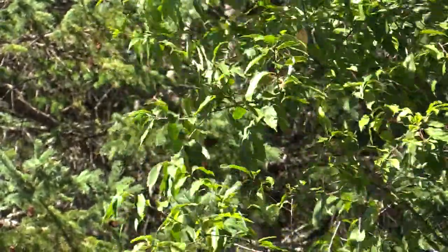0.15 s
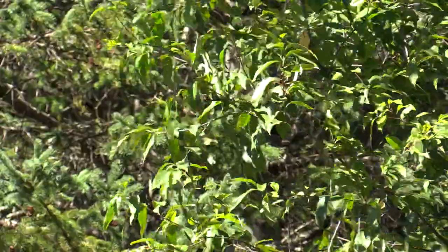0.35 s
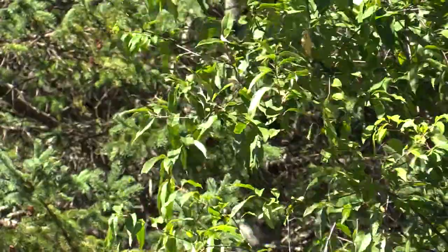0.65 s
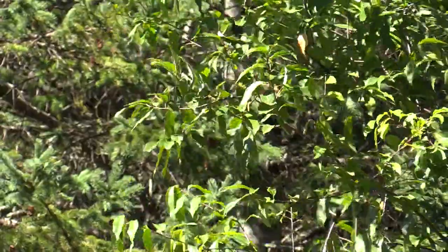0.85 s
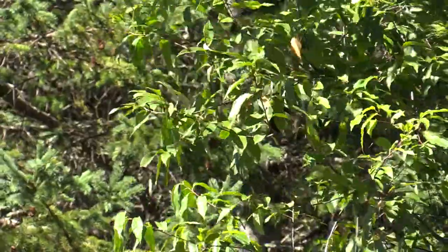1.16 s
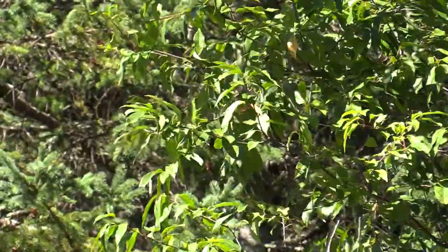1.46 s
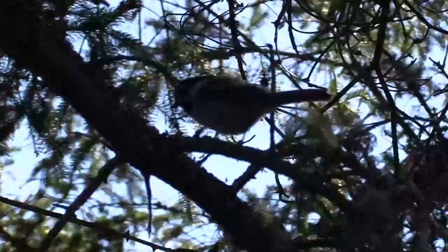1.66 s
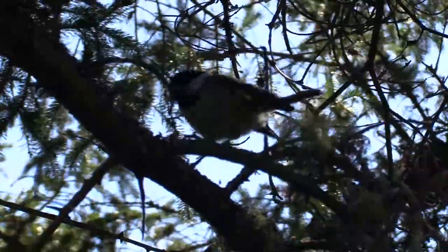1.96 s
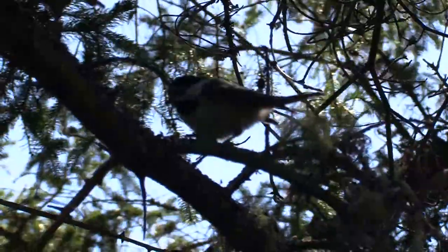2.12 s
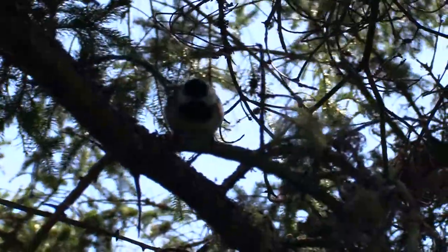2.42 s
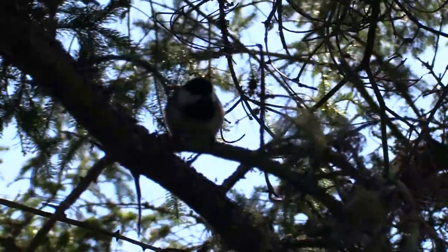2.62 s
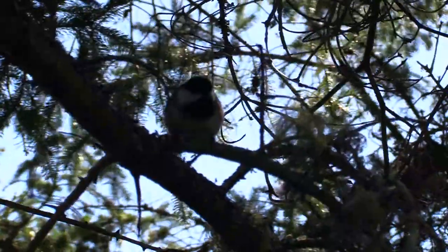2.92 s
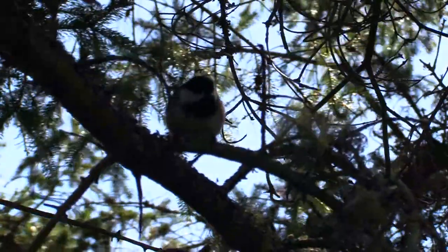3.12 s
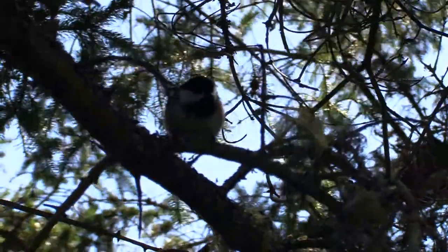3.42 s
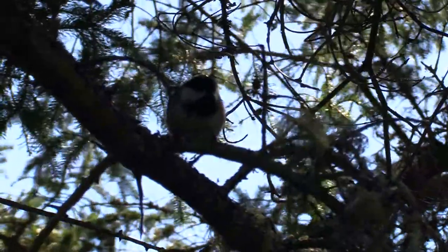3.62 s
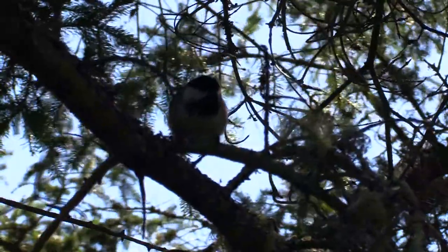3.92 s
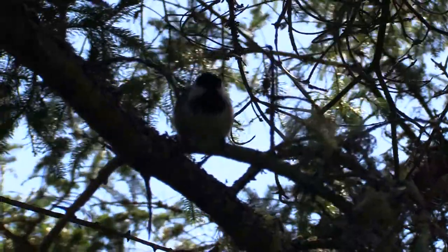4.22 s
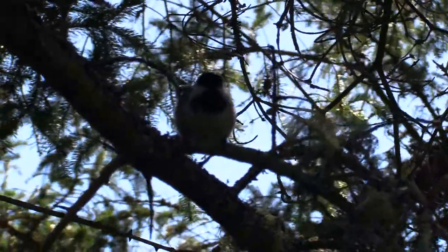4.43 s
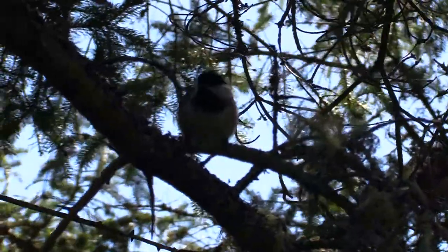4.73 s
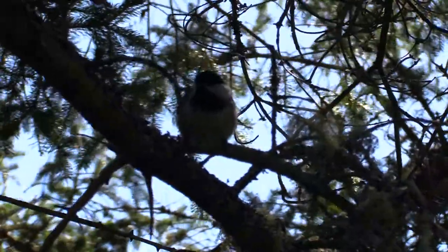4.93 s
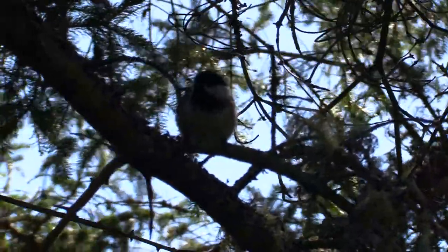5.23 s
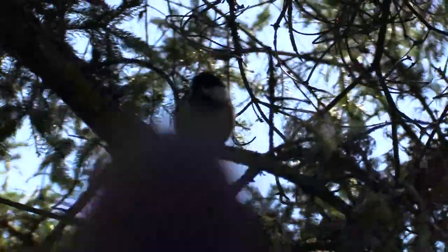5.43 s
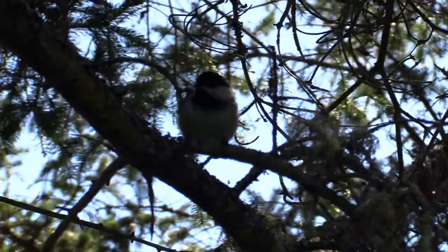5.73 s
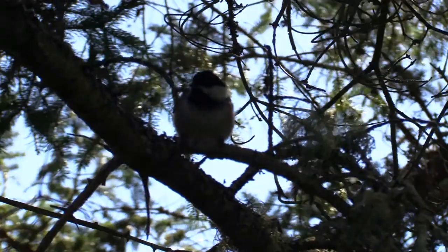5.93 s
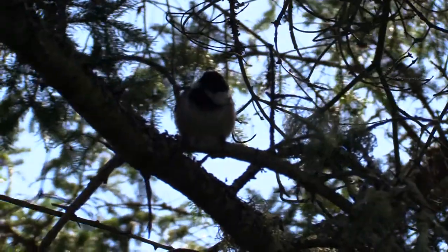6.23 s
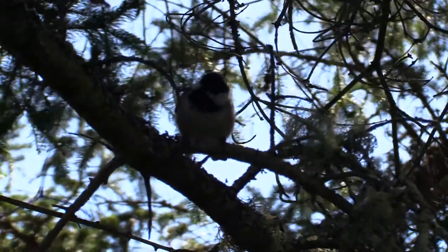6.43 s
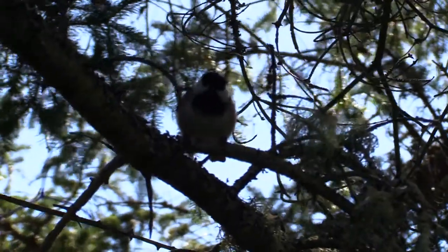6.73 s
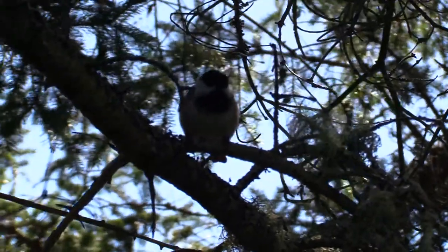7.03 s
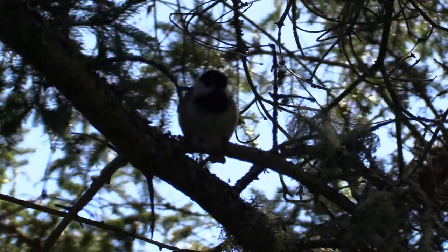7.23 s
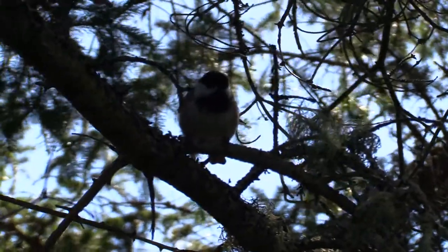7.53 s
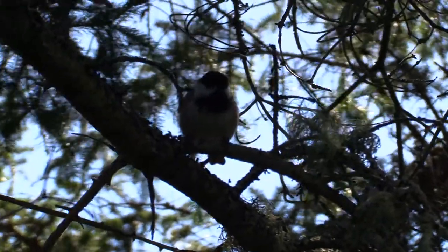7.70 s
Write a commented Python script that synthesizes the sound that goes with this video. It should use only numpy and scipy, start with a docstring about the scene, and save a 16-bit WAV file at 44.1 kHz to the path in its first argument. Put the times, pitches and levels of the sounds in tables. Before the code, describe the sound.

From 0 to 1.66 seconds there is only a quiet, low-weighted breeze through foliage with a faint camera whirr, plus three very fast dull knocks at about 1.07. The air then switches abruptly to a stiller wood. A chickadee immediately gives three high buzzy notes until 1.9; a lower, raspier bird answers with five lengthening notes from 2.3 to 3.0. The higher bird overlaps from 2.8, slows to drawn-out buzzes by 3.9, then rattles off quick, even notes until 5.0. A few very weak lower rasps follow to 5.4, then a pause. From 6.5 the lower bird scolds again, joined by the higher at 6.9, both ending by about 7.4. Soft low handling thumps occur around 3.6, 4.1, 4.6, 5.7, 7.0, 7.35 and strongest at 7.7, with tiny dry ticks near 1.9, 3.3, 5.7 and 6.4, and grip rumble swelling after 7.

```python
"""A quiet wood, where two chickadees scold in runs of short buzzy notes that sometimes overlap.
Each note comes from two coupled membranes, whose sum and difference tones pass a tuned throat.
Air noise of a breezier spot gives way abruptly to that of a stiller one.
The hand-held camera adds damped low thumps, bursts of ticks and knocks, a grip rumble and a faint whirr."""
import sys
import numpy as np
from scipy import signal
from scipy.fft import rfft, irfft
from scipy.io import wavfile
from scipy.ndimage import uniform_filter1d

SR = 44100
rng = np.random.default_rng(int(sys.argv[2]) if len(sys.argv) > 2 else 0)


def put_to_file(sound):
    """Save the sound as 16-bit audio at rate SR, in the file named by the first command-line argument."""
    columns = np.atleast_2d(sound).T  # one column per channel
    safe = np.clip(columns, -1, 1)
    whole_steps = np.round(safe * 32767)
    wavfile.write(sys.argv[1], SR, whole_steps.astype(np.int16))


N = 346626
TIME = np.arange(N) / SR  # seconds

# Air spectrum at the breezy spot. Each row: frequency in Hz, relative spectral level in dB.
BREEZY_SPECTRUM = [(15, -78), (25, -57), (45, -39), (73, -5), (110, 0.5), (368, -9.5), (537, -14.5),
                   (1300, -20), (2700, -20), (2920, -15.5), (3170, -20), (3440, -18.5), (3830, -21.5),
                   (4870, -21.5), (11200, -38.5), (15500, -41)]
# Left-right likeness of the breezy air. Each row: frequency in Hz, correlation from -1 to 1.
BREEZY_LIKENESS = [(60, 0.88), (130, 0.85), (290, 0.87), (640, -0.004), (1410, -0.41), (3100, -0.43),
                   (6820, 0.4), (15000, 0.22)]
# Air spectrum at the still spot. Each row: frequency in Hz, relative spectral level in dB.
STILL_SPECTRUM = [(15, -55), (25, -19), (64, 2.5), (110, -7.5), (129, -4), (152, -1.5), (209, -1.5),
                  (410, -6), (495, -7), (1240, -11), (1380, -12), (2490, -13.5), (3000, -15.5),
                  (4260, -10.5), (15500, -31.5)]
# Left-right likeness of the still air. Each row: frequency in Hz, correlation from -1 to 1.
STILL_LIKENESS = [(60, 0.043), (130, -0.41), (290, 0.39), (640, -0.099), (1410, -0.38), (3100, -0.1),
                  (6820, 0.56), (15000, 0.53)]
BREEZY_DB, STILL_DB = -52, -55.5  # rms level of the mean of both sides
CUT_S = 1.66  # the breezy spot ends here

# Low rumble of the shifting grip. Each row: time in seconds, level in dB.
GRIP_LEVEL = [(1.62, -80), (1.72, -60), (1.96, -50), (2.05, -77), (6.5, -77), (7.05, -43.5), (7.25, -55.5),
              (7.42, -42.5), (7.65, -50), (7.76, -41), (7.86, -43)]
# Jolts of the hand on the camera body. Each row: start in seconds, level in dB, ring frequency in Hz.
JOLTS = [(1.799, -50, 63), (1.95, -49, 64), (3.608, -36, 105), (3.632, -49, 91), (4.08, -42, 109),
         (4.123, -38, 98), (4.206, -42, 82), (4.596, -36, 124), (5.525, -49, 65), (5.735, -32, 105),
         (5.835, -37, 79), (7.025, -38, 94), (7.347, -32, 94), (7.684, -26.5, 102)]
# A quick run of dull knocks. Each row: start in seconds, level in dB.
DULL_KNOCKS = [(1.068, -40), (1.0776, -38), (1.0859, -37)]
# Small dry ticks. Each row: start in seconds, peak level in dB, centre frequency in Hz.
DRY_TICKS = [(1.938, -27.5, 8760), (3.279, -35.5, 7600), (5.737, -32, 2980), (5.8205, -35, 6600),
             (6.442, -42, 8000)]

# Throat and beak of the lower bird at its usual pitch. Each row: frequency in Hz, relative gain in dB.
LOW_THROAT_GAIN = [(850, -46), (1420, -13.5), (1640, -9.5), (1780, -6), (2120, -10.5), (2500, -2.5),
                   (2850, -0.5), (3200, 6), (3570, -1.5), (3900, -3), (4250, -7), (4900, -14), (5600, -25),
                   (6600, -25.5), (9000, -42), (14000, -76)]
# Throat and beak of the higher bird at its usual pitch. Each row: frequency in Hz, relative gain in dB.
HIGH_THROAT_GAIN = [(900, -41), (1550, -16), (1950, -13.5), (2450, -4), (2900, -17), (3200, -2.5),
                    (3520, 0), (3770, -2), (3990, -7.5), (4450, -4), (4950, -12.5), (5480, -6.5),
                    (6000, -18), (9000, -35.5), (14000, -57)]
# Notes of the lower bird. Each row: start in seconds, end in seconds, top pitch in Hz,
# level before mixing in dB, beat between the membranes in Hz.
LOW_CALLS = [(2.338, 2.404, 3015, -43.5, 278.5), (2.427, 2.5, 3230, -39.5, 341),
             (2.524, 2.622, 3260, -38.5, 366), (2.653, 2.774, 3187, -39, 377.4),
             (2.82, 2.968, 3034, -44.5, 351.5), (5.069, 5.124, 2900, -56, 299),
             (5.119, 5.191, 2950, -55, 292), (5.281, 5.362, 2720, -62, 298), (6.502, 6.553, 2836, -46, 290),
             (6.575, 6.634, 3110, -43, 345), (6.66, 6.773, 3160, -41, 360),
             (6.808, 6.962, 3090, -40.5, 350.7), (7.01, 7.158, 2954, -42.5, 380),
             (7.202, 7.334, 2967, -46, 356.3)]
# Notes of the higher bird. Each row: start in seconds, end in seconds, top pitch in Hz,
# level before mixing in dB.
HIGH_CALLS = [(1.662, 1.715, 3490, -40), (1.738, 1.8, 3560, -39.5), (1.838, 1.915, 3450, -41),
              (2.774, 2.819, 3550, -41.5), (2.843, 2.897, 3500, -42.5), (2.918, 2.977, 3590, -43),
              (2.997, 3.057, 3550, -40.5), (3.083, 3.149, 3446, -41.5), (3.175, 3.24, 3476, -42),
              (3.284, 3.36, 3420, -43), (3.456, 3.558, 3150, -43.5), (3.572, 3.703, 3332, -40.5),
              (3.723, 3.895, 3280, -41), (3.89, 3.917, 3410, -47.5), (3.974, 4.016, 3530, -42.5),
              (4.043, 4.081, 3600, -41), (4.106, 4.149, 3585, -40), (4.174, 4.232, 3534, -40.5),
              (4.26, 4.322, 3530, -40), (4.351, 4.42, 3560, -40), (4.455, 4.526, 3496, -41),
              (4.562, 4.623, 3554, -41), (4.667, 4.729, 3574, -40.5), (4.758, 4.819, 3610, -40.5),
              (4.847, 4.913, 3560, -39.5), (4.947, 5.025, 3584, -42), (6.903, 6.943, 3600, -43.5),
              (6.958, 7.006, 3623, -42), (7.034, 7.093, 3580, -40.5), (7.111, 7.169, 3560, -41.5),
              (7.196, 7.278, 3523, -42), (7.323, 7.389, 3410, -45)]
# Treble tilt of the higher bird's voice. Each row: time in seconds, gain of the treble in dB.
HIGH_TREBLE_TILT = [(2.9, -5.5), (3.2, -6), (3.5, -4.5), (4.05, -7), (4.55, -5.5), (4.85, -1), (5.0, -7),
                    (7.3, -5.5)]

# A note climbs from the resting pitch to its crest (a share of its length, crest_s at the latest),
# then falls back by the share sag of that climb; the higher flatness, the flatter the top.
# The level swells with the arch by swell_db. side_db weakens each further difference tone.
# tuning is how far the throat adapts to the pitch of each note.
LOW_VOICE = dict(usual_hz=3230, rest_hz=2575, sag=0.47, crest_share=0.72, crest_s=0.08, flatness=2.6,
                 swell_db=5, side_db=3.5, tuning=0.83, attack_s=0.015, release_s=0.0088)
HIGH_VOICE = dict(usual_hz=3530, rest_hz=2900, sag=0.85, crest_share=0.63, crest_s=0.052, flatness=2.0,
                  swell_db=10.5, side_db=8.5, tuning=1, attack_s=0.013, release_s=0.01)
LEAD_S = 0.006  # each note begins to sound this long before its listed start
WOBBLE_HZ = 220  # low-pass limit of the membranes' unsteadiness
JITTER = 0.026  # rms share of membrane pitch at the crest, at roughness one
HISS_DB = -8  # air noise relative to the buzz, at the crest and roughness one
SLACK_UNREST = 2.6  # growth of roughness as the membranes slacken
FOLLOW = 0.82  # share of each pitch bend that the throat follows
SHUT_DROP, SHUT_S = 0.081, 0.0062  # share of the pitch lost as a note shuts, and its time constant
HOP = 16  # samples between updates of the line strengths
EDGE_HZ = 15850


def amp(db):
    """The decibel law: level to amplitude gain."""
    return 10 ** (np.asarray(db) / 20)


def evened(x):
    """Normalization of power: scales to an rms of one."""
    return x / np.sqrt(np.mean(abs(x) ** 2) + 1e-20)


def read(points, hz):
    """Interpolation of a table along a logarithmic frequency axis."""
    f, value = np.transpose(points)
    return np.interp(np.log(abs(hz) + 1), np.log(f + 1), value)


def add(mix, s, sound):
    """Superposition: adds a sound into the mix at time s."""
    part = mix[..., round(s * SR):][..., :sound.shape[-1]]
    part += sound[..., :part.shape[-1]]


def smooth(x, hz):
    """Second-order low-pass filtering."""
    return signal.lfilter(*signal.butter(2, min(hz, SR / 3), fs=SR), x)


def resonate(x, hz, width_hz):
    """Simple resonance: one pole pair with a gain of one at its centre."""
    return signal.lfilter(*signal.iirpeak(hz, hz / width_hz, fs=SR), x)


def air(spectrum, likeness, patchy_db):
    """Turbulence noise: wind in the trees as shaped, partly correlated noise with drifting patches."""
    hz = np.fft.rfftfreq(2048, 1 / SR)
    a, b, c, d, patches = rng.standard_normal((N // 512 + 5, len(hz), 5)).T
    patches = uniform_filter1d(patches, size=16, axis=0)
    patches = evened(uniform_filter1d(patches, size=8, axis=1))
    same = np.clip(read(likeness, hz), -0.95, 0.95)[:, None]
    left = a + 1j * b
    right = same * left + np.sqrt(1 - same ** 2) * (c + 1j * d)
    pair = np.array([left, right]) / np.sqrt(1 + same)  # keeps the power of the sum steady
    shaped = pair * amp(read(spectrum, hz)[:, None] + patchy_db * patches)
    out = signal.istft(shaped, nperseg=2048, noverlap=1536)[1][:, :N]
    return out / out.mean(0).std()


def background():
    """Broadband, narrow-band and pure-tone sources: the air, and the camera's whirr and thin whine."""
    moved = np.clip((TIME - CUT_S) / 0.012, 0, 1)
    breezy = amp(BREEZY_DB) * air(BREEZY_SPECTRUM, BREEZY_LIKENESS, patchy_db=1.0)
    still = amp(STILL_DB) * air(STILL_SPECTRUM, STILL_LIKENESS, patchy_db=1.08)
    wind = (1 - moved) * breezy + moved * still
    whirr_gain = amp(-65.5) * (1 - moved) + amp(-64.5) * moved
    whirr = evened(resonate(rng.standard_normal((2, N)), 3070, 200)) * whirr_gain
    whine = amp(-85) * np.sin(2 * np.pi * 15734 * TIME)
    return wind + whirr + whine


def rocked(x, sway_hz=44, rock_hz=68, turn=2.41, balance_db=-1.0):
    """Phase of body motion: slow sway moves both ports together, faster rocking nearly against each other."""
    apart = np.interp(np.fft.rfftfreq(N, 1 / SR), [sway_hz, rock_hz], [0, turn])  # radians
    side = np.array([[1], [-1]]) / 2
    return irfft(rfft(x) * np.exp(-1j * side * apart), N) * amp(side * balance_db)


def grip(low_hz=64, high_hz=135):
    """Random excitation: countless tiny finger jolts blur into band-limited rumble of the camera body."""
    band = signal.butter(2, [low_hz, high_hz], "bandpass", fs=SR, output="sos")
    rumble = signal.sosfilt(band, rng.standard_normal(N))
    return rocked(evened(rumble) * amp(np.interp(TIME, *np.transpose(GRIP_LEVEL))))


def handling(rise_s=0.0053, decay_s=0.028, rustle_db=-12, rustle_hz=220, sway_db=-9, sway_hz=66,
             shell_db=-3, shell_hz=175, shell_decay_s=0.023):
    """Damped oscillation: each jolt rocks the camera, with a slower sway, a shell knock and a dull rub."""
    t, ring, rub = TIME[:SR // 3], np.zeros(N), np.zeros(N)
    shape = (1 - np.exp(-(t / rise_s) ** 2)) * np.exp(-t / decay_s)
    shape /= shape.max()
    sway = amp(sway_db) * np.sin(2 * np.pi * sway_hz * t)
    # the shared shape damps the shell further
    shell = amp(shell_db) * np.exp(-t / shell_decay_s) * np.sin(2 * np.pi * shell_hz * t)
    for s, db, hz in JOLTS:
        rock = 0.85 * np.sin(2 * np.pi * hz * t)
        add(ring, s, amp(db) * shape * (rock + sway + shell))
        add(rub, s, amp(db) * shape)
    rustle = evened(smooth(rng.standard_normal(N), rustle_hz))
    return rocked(ring + amp(rustle_db) * rub * rustle)


def taps(knock_hz=300, knock_decay_s=0.00083, tick_decay_s=0.00051, tick_width_hz=4500):
    """Impulsive excitation: heavily damped dull knocks, and tiny noise bursts through a broad resonance."""
    t, out = TIME[:SR // 30], np.zeros((2, N))
    for s, db in DULL_KNOCKS:
        body = 2.9 * np.sin(2 * np.pi * knock_hz * t) + 0.13 * rng.standard_normal(len(t))
        add(out, s, amp(db) * np.exp(-t / knock_decay_s) * body)
    for s, db, hz in DRY_TICKS:
        burst = rng.standard_normal((2, len(t))) * np.exp(-t / tick_decay_s)
        tick = resonate(burst, hz, tick_width_hz)
        tick = resonate(tick + 0.5 * tick[::-1], hz, tick_width_hz)  # each side leaks into the other
        tick = smooth(tick, 11400)
        add(out, s, amp(db) * tick / abs(tick).max())
    return out


def woods(x, near_db, near_t60, far_db, far_t60):
    """Scattering: near twigs spread the call differently to each side, far trunks add a faint tail."""
    t = TIME[:SR // 2]
    near, far = rng.standard_normal((2, 2, len(t))) * (t > 0.001)
    near = near * amp(-60 * t / near_t60)
    far = far * amp(-60 * t / far_t60)
    echo = (amp(near_db) * evened(near) + amp(far_db) * evened(far)) / np.sqrt(len(t))
    return signal.fftconvolve(x[None], echo, axes=1)[:, :N]


def ports(x, balance_db, turn):
    """Interaural-like difference: two microphone ports hear a source apart in level and phase (radians)."""
    side = np.array([[1], [-1]]) / 2
    return (signal.hilbert(x) * np.exp(1j * turn * side)).real * amp(side * balance_db)


def unsteadiness():
    """Random modulation: low-passed wobble of either membrane, and the white noise of the air flow."""
    a, b, flow = rng.standard_normal((3, N))
    return np.array([evened(smooth(a, WOBBLE_HZ)), evened(smooth(b, WOBBLE_HZ)), flow])


def membrane_slack(t, length, voice):
    """Tension arch: slackness is zero at the crest and grows towards both ends; also returns the bend share."""
    crest = min(min(voice["crest_share"], 0.9) * length, voice["crest_s"])
    rising = t < crest
    distance = np.where(rising, (crest - t) / crest, (t - crest) / (length - crest))
    slack = np.minimum(distance ** voice["flatness"], 1.5)
    return slack, np.where(rising, 1, voice["sag"])


def note(chance, throat, voice, start, end, pitch_hz, db, beat_hz, rough, bright_db, body_db, core_db):
    """Nonlinear coupling: pitched at the sum tone, every harmonic group splits into lines a beat apart."""
    length = end - start
    t = np.arange(-LEAD_S, length + voice["release_s"] / 3, 1 / SR)
    wobble_low, wobble_high, flow = chance[:, round(start * SR):][:, :len(t)]
    slack, bend_share = membrane_slack(t, length, voice)

    # air pressure lifts pitch and level together; the pitch drops away as the note shuts
    climb = 1 - voice["rest_hz"] / pitch_hz
    shutting = SHUT_DROP * np.exp((t - t[-1]) / SHUT_S)
    bend = 1 - slack * climb * bend_share - shutting
    unrest = rough * (1 + SLACK_UNREST * slack)  # slack membranes beat less regularly
    low = (pitch_hz - beat_hz) / 2 * bend * (1 + JITTER * unrest * wobble_low)
    high = (pitch_hz + beat_hz) / 2 * bend * (1 + JITTER * unrest * wobble_high)

    # a line takes (group - step) times the low membrane plus step times the high one
    pairs = [(k, j) for k in range(1, 7) for j in range(-2, min(k, 3) + 4)]
    group, step = np.array(pairs).T[..., None]
    hz = group * low + step * (high - low)
    outside = np.maximum(np.maximum(-step, step - group), 0)  # order of the difference tone, 0 for sums

    def colour(f):
        """Resonant filtering: the throat is tuned to the pitch of the note."""
        treble_tilt = bright_db * np.clip((f - 3400) / 700, 0, 1)
        body_tilt = body_db * np.clip((2700 - f) / 500, 0, 1)
        tuned_hz = f * (voice["usual_hz"] / pitch_hz) ** voice["tuning"]
        return amp(read(throat, tuned_hz) + treble_tilt + body_tilt)

    phase = 2 * np.pi * (np.cumsum(hz, 1) / SR + rng.random(group.shape))
    phase = phase.astype(np.float32)
    lines = colour(hz[:, ::HOP] / bend[::HOP] ** FOLLOW)  # the throat follows the arch
    lines = lines * amp(-voice["side_db"] * outside)  # difference tones are weaker than sum tones
    lines = lines * amp(core_db * ((group == 2) & (step == 1)))  # gain of the main sum tone
    lines = lines / np.sqrt((lines ** 2).sum(0) / 2)
    buzz = (np.repeat(lines, HOP, axis=1)[:, :len(t)] * np.cos(phase)).sum(0)

    hiss_colour = colour(np.fft.rfftfreq(len(t), 1 / SR)) ** 0.45  # a softened throat
    hiss = evened(irfft(rfft(flow) * hiss_colour, len(t)))
    attack = np.clip((t - t[0]) / voice["attack_s"], 0, 1)
    release = np.clip((t[-1] - t) / voice["release_s"], 0, 1)
    swell = amp(-voice["swell_db"] * slack)
    voiced = buzz + amp(HISS_DB) * unrest * hiss
    return amp(db) * evened(voiced * attack * release * swell)


def low_bird(firm_db=-40.5, firm_rough=0.2, rough_per_db=0.16, bright_db=1.6, bright_db_per_octave=42,
             body_db=1.5, body_db_per_octave=20):
    """Irregular vibration: weak notes break into a rasp, deep ones spread away from the main resonance."""
    chance, out = unsteadiness(), np.zeros(N)
    for start, end, pitch_hz, db, beat_hz in LOW_CALLS:
        depth = np.log2(LOW_VOICE["usual_hz"] / pitch_hz)  # octaves below the usual pitch
        sound = note(chance, LOW_THROAT_GAIN, LOW_VOICE, start, end, pitch_hz, db, beat_hz,
                     rough=min(firm_rough + rough_per_db * max(firm_db - db, 0), 1),
                     bright_db=bright_db + bright_db_per_octave * depth,
                     body_db=body_db + body_db_per_octave * depth,
                     core_db=-0.5)
        add(out, start - LEAD_S, sound)
    return out


def high_bird(usual_beat_hz=355, beat_per_hz=0.174, usual_s=0.058, usual_rough=0.37, rough_per_octave=0.17,
              body_db_per_octave=4.5, core_db=3.5, core_db_per_octave=5):
    """Tension and beat: hurried notes are rougher and fuller below; drawn-out ones have a weaker main tone."""
    chance, out = unsteadiness(), np.zeros(N)
    for start, end, pitch_hz, db in HIGH_CALLS:
        hurry = np.log2(usual_s / (end - start))  # octaves shorter than the usual length
        # the membranes part as they tighten
        beat_hz = usual_beat_hz + beat_per_hz * (pitch_hz - HIGH_VOICE["usual_hz"])
        sound = note(chance, HIGH_THROAT_GAIN, HIGH_VOICE, start, end, pitch_hz, db, beat_hz,
                     rough=usual_rough + rough_per_octave * max(hurry, 0),
                     bright_db=np.interp(start, *np.transpose(HIGH_TREBLE_TILT)),
                     body_db=body_db_per_octave * hurry,
                     core_db=core_db + core_db_per_octave * min(hurry, 0))
        add(out, start - LEAD_S, sound)
    return out


def scene():
    """Superposition of direct and scattered birdsong, the air and the camera's noises."""
    high, low = high_bird(), low_bird()
    direct_high = amp(-4.5) * ports(high, balance_db=2.5, turn=0.14)
    direct_low = amp(-0.4) * ports(low, balance_db=1.2, turn=0.15)
    scattered = woods(high + low, near_db=-6, near_t60=0.02, far_db=-15.0, far_t60=0.45)
    return direct_high + direct_low + scattered + background() + handling() + grip() + taps()


def record(dry):
    """Band limitation: a steep linear-phase low-pass at the upper edge."""
    low_pass = signal.firwin(1023, EDGE_HZ, window=("kaiser", 9), fs=SR)
    return signal.oaconvolve(dry, low_pass[None], "same")


dry = scene()
out = record(dry)
put_to_file(out)
```